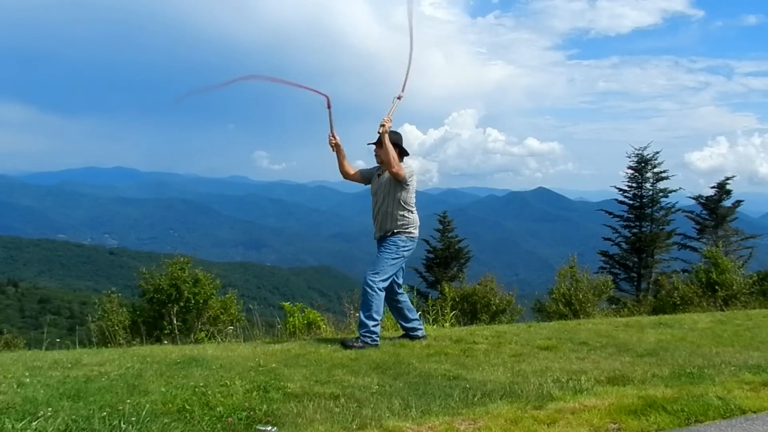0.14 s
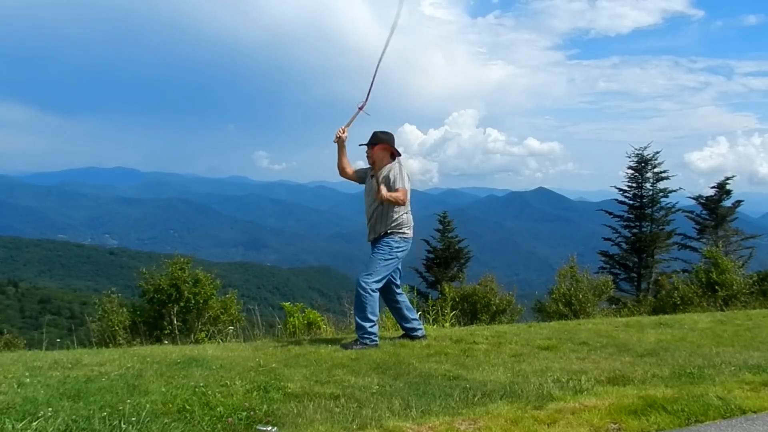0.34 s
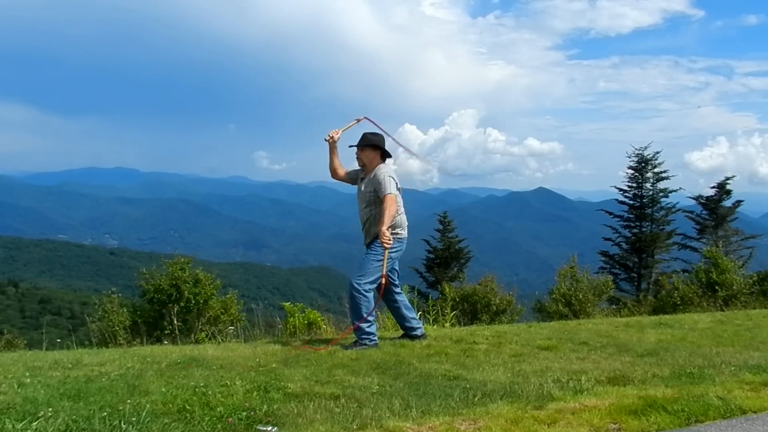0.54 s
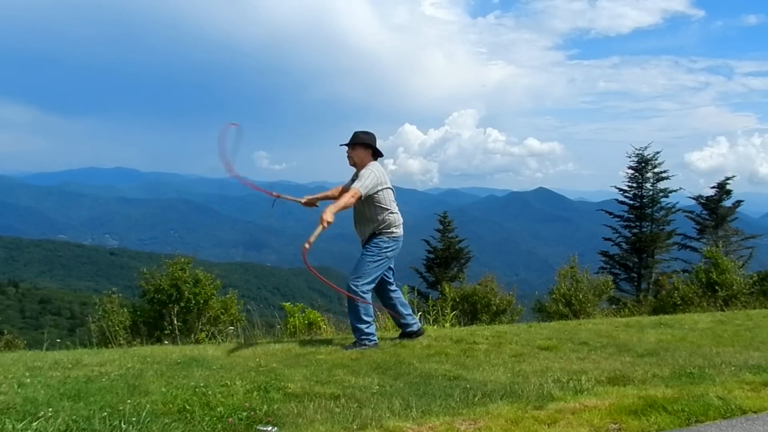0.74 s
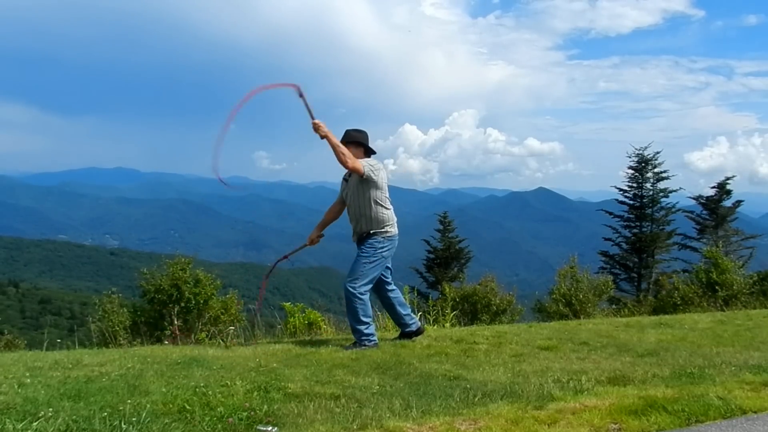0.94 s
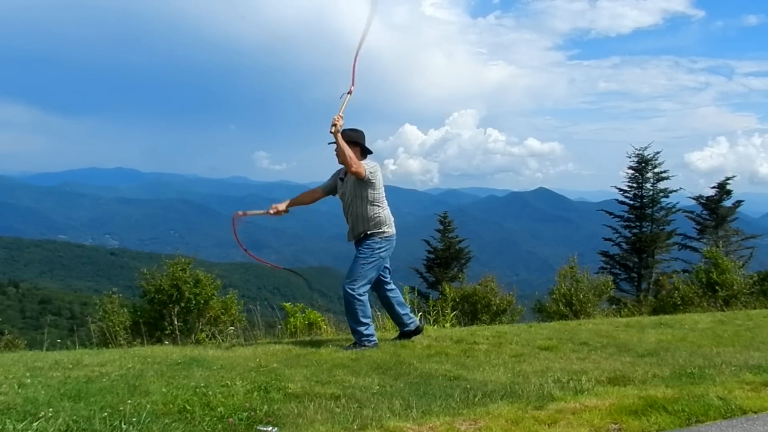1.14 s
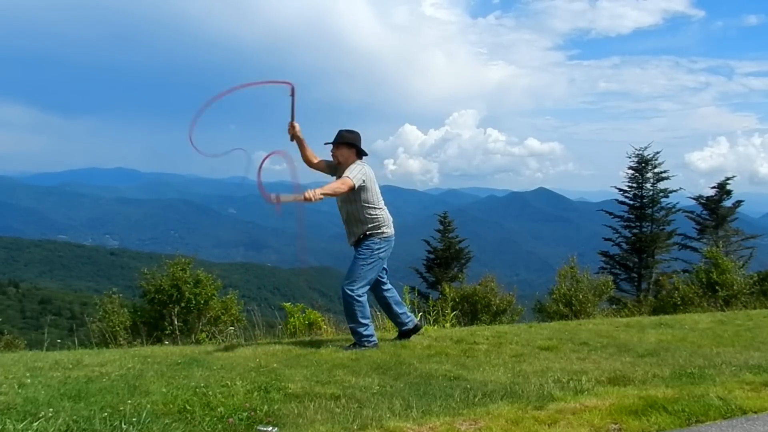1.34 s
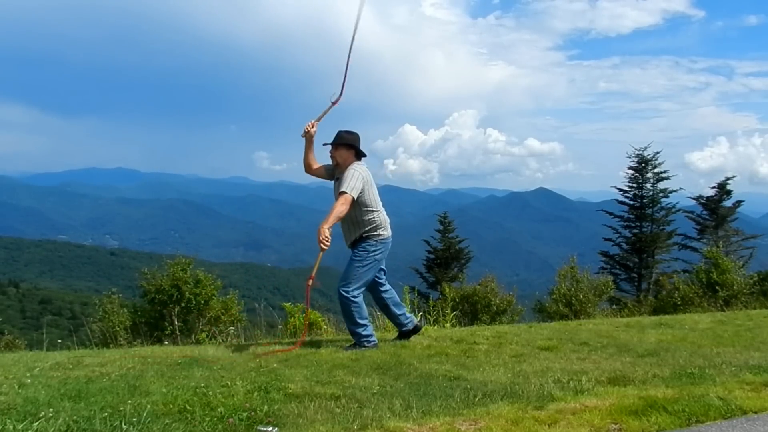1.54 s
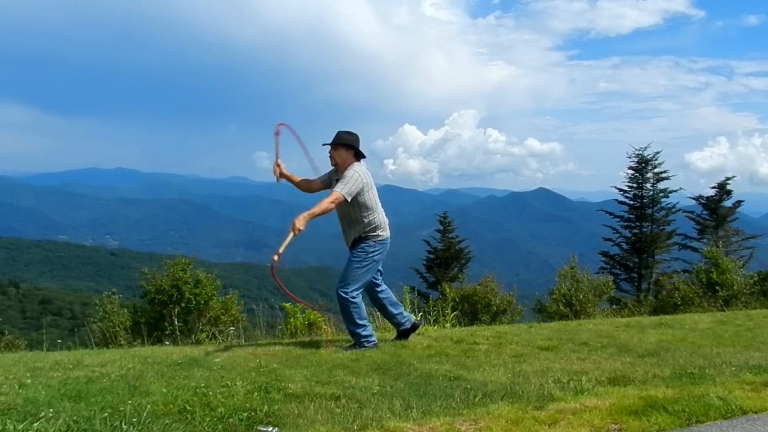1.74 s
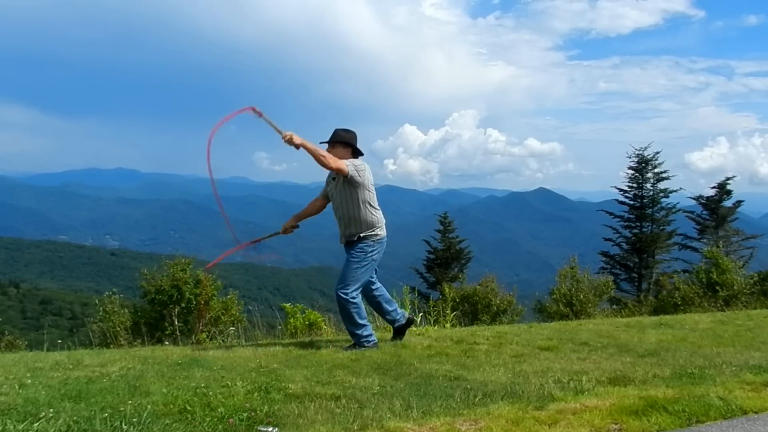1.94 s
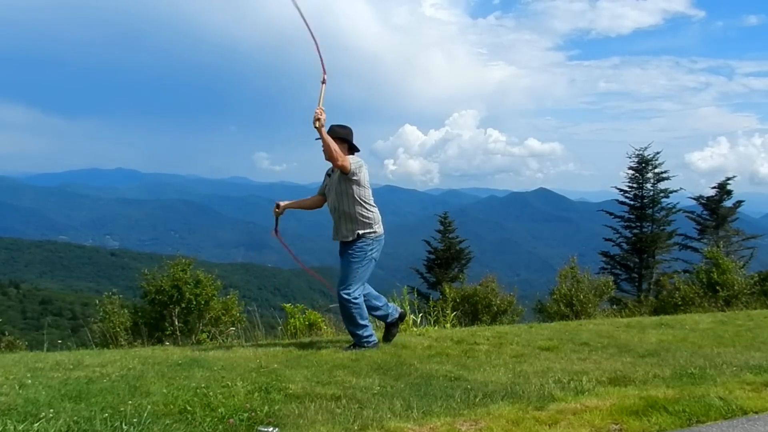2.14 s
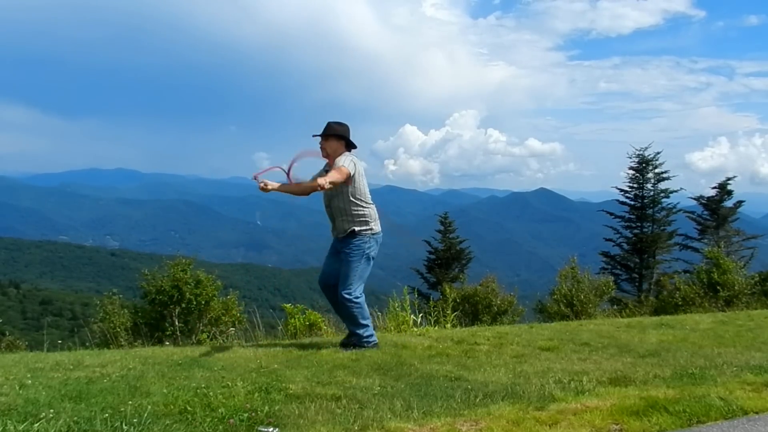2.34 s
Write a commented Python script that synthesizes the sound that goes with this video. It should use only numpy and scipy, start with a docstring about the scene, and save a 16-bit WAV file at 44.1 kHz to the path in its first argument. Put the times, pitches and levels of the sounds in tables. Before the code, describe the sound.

Two bullwhips crack about twice a second on an open hilltop, whooshing between dry snaps

```python
"""Two whips swung on an open hilltop, heard through the two microphone ports of a camera.
From the start wind rumbles (shaped noise), air murmurs and hisses (noise), and the thongs whistle (noise held
on a moving pitch) and flick (short noise puffs). Short noise swells lead up to loud cracks, each a swinging
shock front with a sharp click and a scattered noise tail. Lesser snaps are made the same way: one comes just
before a crack, and most others are cracks thrown back by nearby things.
The hiss falls away after the second crack, and later comes and goes."""
import sys
import numpy as np
from scipy import signal
from scipy.fft import rfft, irfft, next_fast_len
from scipy.io import wavfile
from scipy.ndimage import map_coordinates

SR = 44100
rng = np.random.default_rng(int(sys.argv[2]) if len(sys.argv) > 2 else 0)


def unload_wav(signal):
    """Save mono or channel-first audio to the path in sys.argv[1] as 16-bit WAV at rate SR, clipped to [-1, 1]."""
    wavfile.write(
        sys.argv[1],
        SR,
        np.round(np.clip(np.atleast_2d(signal).T, -1, 1) * 32767).astype(np.int16),
    )


N = 110250  # samples in the scene


def amp(db):
    """Turn decibels into a plain multiplier."""
    return 10 ** (np.asarray(db) / 20)


def unit(x):
    """Scale a sound to an average (RMS) level of one."""
    return x / np.sqrt(np.mean(x ** 2) + 1e-20)


def along(points, hz):
    """Read a curve of (pitch_hz, value) points, with pitch on a log axis."""
    point_hz, values = np.transpose(points)
    return np.interp(np.log(hz + 1), np.log(point_hz + 1), values)


def curves(rows):
    """Give one value per sample for each column after the time."""
    times_s, *columns = np.transpose(rows)
    return [np.interp(np.arange(N) / SR, times_s, column) for column in columns]


def wobble(rate):
    """Draw a smooth random curve through `rate` random points a second."""
    points = rng.standard_normal(int(N * rate / SR) + 4)
    return map_coordinates(points, [np.arange(N) * rate / SR])


def filtered(x, response):
    """Multiply the spectrum of x by a response that depends on frequency."""
    n = x.shape[-1]
    padded = next_fast_len(n + 8192)  # room for the filter to ring out
    spectrum = rfft(x, padded) * response(np.fft.rfftfreq(padded, 1 / SR))
    return irfft(spectrum, padded)[..., :n]


def peak(f, hz, q):
    """A resonance that rings only after it is struck; a higher q is narrower."""
    return 1j * f * hz / q / (hz * hz - f * f + 1j * f * hz / q)


def pair(n, alike):
    """Left and right noises: alike is 1 for the same, 0 for unrelated, -1 for opposite."""
    a, b = rng.standard_normal((2, n))
    angle = np.arccos(np.clip(alike, -1, 1)) / 2
    shared, opposed = np.cos(angle) * a, np.sin(angle) * b
    return np.array([shared + opposed, shared - opposed])


def add(out, s, x):
    """Mix x into out from time s, in seconds."""
    i = round(s * SR)
    out[:, i:i + x.shape[1]] += x[:, :N - i]


def wind():
    """Wind buffets the ports: lumpy low noise, partly opposed between left and right."""
    # Buffeting strength: time_s, level_db (before the lift below)
    buffeting = [(0, -54.5), (.12, -50), (.25, -55.5), (.38, -54), (.43, -43), (.52, -40), (.58, -43),
                 (.64, -55.5), (.7, -37.5), (.78, -33), (.83, -44.5), (.9, -34.5), (.95, -71.5), (1.0, -53),
                 (1.07, -55), (1.2, -69.5), (1.35, -63.5), (1.5, -57), (1.62, -69.5), (1.7, -67.5),
                 (1.85, -71), (1.97, -56.5), (2.1, -72), (2.3, -60.5), (2.4, -58), (2.5, -55)]
    # Tone of the rumble: pitch_hz, relative_db
    rumble_tone = [(12, -43.5), (20, -18.5), (54, -10), (97, 1), (169, -19.5), (198, -17.5), (273, -21.5),
                   (484, -36), (818, -47.5), (900, -40), (1170, -67.5), (1980, -120)]
    [level_db] = curves(buffeting)
    lumps = amp(3 * np.array([wobble(22), wobble(22)]))
    rumble = filtered(pair(N, -0.28), lambda f: amp(along(rumble_tone, f)))
    return amp(level_db + 8.5) * unit(lumps * rumble)


def wind_slaps():
    """Single wind slaps: one brief low swing, turned over in the right port, which is mostly the weaker."""
    # Slaps: time_s (centre 3.9 ms later), strength_db (before the lift), pitch_hz, left_right_db (before the .4)
    slap_rows = [(0.507, -33, 86.1, 6), (0.725, -29, 121, 11.5), (0.79, -21, 83, -9.5),
                 (0.869, -24, 121, 9)]
    out = np.zeros((2, N))
    t = np.arange(-900, 900) / SR
    for s, db, hz, pan_db in slap_rows:
        slap = np.sin(2 * np.pi * hz * t) * np.exp(-(2.25 * hz * t) ** 2)
        sides = np.array([[amp(pan_db / 2)], [-.4 * amp(-pan_db / 2)]])
        add(out, s + t[0] + 0.0039, amp(db + 8.5) * sides * slap)
    return out


def air():
    """A low distant murmur of air, and a hiss that loses its treble as it falls."""
    # Strength of both: time_s, murmur_db, hiss_db (before the lifts and wobbles below)
    air_levels = [(0.0, -51, -60.5), (0.47, -48.5, -61.5), (0.66, -55, -58), (0.79, -57.5, -61.5),
                  (0.93, -59, -58.5), (1.07, -77, -77), (1.14, -64.5, -82.5), (1.35, -65, -74),
                  (1.45, -55.5, -77.5), (1.58, -59, -56), (1.68, -81.5, -66.5), (1.87, -63.5, -70),
                  (2.05, -59, -69.5), (2.2, -71.5, -74.5), (2.35, -60.5, -80.5), (2.5, -51.5, -71)]
    # Tone of the murmur, then of the hiss: pitch_hz, relative_db
    murmur_tone = [(88, -39), (150, 4.5), (322, 6), (532, -11.5), (667, 2.5), (947, -14), (1220, -10.5),
                   (3000, -42.5), (3900, -61), (6600, -120)]
    hiss_tone = [(530, -29.5), (900, -13), (1100, -7.5), (1190, -14), (1310, -4.5), (2250, -14),
                 (12000, -11.5), (16000, -10.5)]
    hiss_dulls = 2.1  # dB of extra treble loss for each dB that the hiss falls
    hiss_flicker_db = 1.8
    murmur_db, hiss_db = curves(air_levels)

    murmur_points = [(60, -33.0)] + murmur_tone + [(6000, -64.5)]
    murmur = unit(filtered(pair(N, 0.84), lambda f: amp(along(murmur_points, f))))
    murmur_gain = amp(murmur_db + 1.5 + 2.9 * wobble(22))

    hiss_points = [(300, -35.0)] + hiss_tone
    hiss = unit(filtered(pair(N, 0.078), lambda f: amp(along(hiss_points, f))))
    dull = filtered(hiss, lambda f: 1 / (1 + (f / 7000) ** 8))
    hiss = dull + (hiss - dull) * amp(hiss_dulls * (hiss_db - hiss_db.max()))
    hiss_gain = amp(hiss_db + 7.5 + hiss_flicker_db * wobble(35))
    return murmur_gain * murmur + hiss_gain * hiss


def whistle(table, steady, width_hz, octave_db, swish_db):
    """Whirls of air shed by the thong: noise held on the pitch, its octave, and a broad rough swish."""
    hz, level_db = curves(table)
    turn = 2 * np.pi * np.cumsum(hz) / SR

    def line(order):
        """Slow noise moved up to a multiple of the pitch; `steady` makes it purer."""
        slow = filtered(rng.standard_normal((2, N)), lambda f: 1 / (1 + (f / (order * width_hz)) ** 4))
        slow = unit(slow) + [[steady], [0]]
        return unit(slow[0] * np.cos(order * turn) + slow[1] * np.sin(order * turn))

    # The swish is rough noise, filtered slice by slice to follow the pitch.
    rough = pair(N, .85) * amp(3.2 * wobble(150))
    f, t, slices = signal.stft(rough, SR, nperseg=512)
    slice_hz = np.interp(t, np.arange(N) / SR, hz)
    gain = abs(peak(f[:, None], 0.98 * slice_hz, q=1.1)) ** 3
    swish = unit(signal.istft(slices * gain, SR, nperseg=512)[1][:, :N])
    return amp(level_db) * (line(order=1) + amp(octave_db) * line(order=2) + amp(swish_db) * swish)


def colour(hz, q, bass_db, treble_db, top_db):
    """A tone of four parts: a body resonance, a bass part, a treble bump and an airy top."""
    def response(f):
        body = peak(f, hz, q) / (1 + 1j * f / (3 * hz))
        bass = peak(f, 310, 0.42) / (1 + 1j * f / 4000)
        treble = peak(f, 5280, 1.7) ** 2
        top = 2 * (1j * f / (8300 + 1j * f)) ** 2
        return body + amp(bass_db) * bass - amp(treble_db) * treble - amp(top_db) * top
    return response


def spread(n, shape, spiky_db):
    """Coloured spiky noise, near mono in the bass and wide in the treble."""
    # How far the side (left-right difference) sits under the middle: pitch_hz, gain_db
    side_gain = [(300, -22), (1500, -8), (4000, -5.5), (9000, -2)]
    spikes = amp(spiky_db * (wobble(800) + 0.33 * wobble(180))[:n])
    a, b = rng.standard_normal((2, n)) * spikes
    mid = filtered(a, shape)
    side = filtered(b, lambda f: shape(f) * amp(along(side_gain, f)))
    return unit(np.array([mid + side, mid - side]))


def flicks():
    """Flicks of the thong: puffs of coloured noise that rise fast and die away. The row at 0.6 s is instead a
    high ring of the first crack."""
    # Flicks: start_s, strength_db (noise is set 17.5 dB lower), pitch_hz (centre), t60_s (time to fade 60 dB),
    # bass_db, treble_db, top_db (gains of the colour's parts), rise_s
    flick_rows = [(0.027, -29, 1550, 0.057, -15, -5, -10, 0.0012),
                  (0.174, -19, 1220, 0.086, -10, -8, -56, 0.00067),
                  (0.193, -30.5, 1100, 0.41, -13, -10.5, -15, 0.0017),
                  (0.259, -18, 724, 0.13, -11, -12.5, -62, 0.0006),
                  (0.505, -31, 643, 0.1, -19, -27.5, -38, 0.0023),
                  (0.6, -3.5, 6200, 0.064, -50, -40, -45, 0.0021),
                  (0.528, -31, 12500, 0.1, -40, -40, -40, 0.0068),
                  (0.673, -24, 668, 0.044, 10, -4, -17, 0.0011),
                  (0.893, -22.5, 1160, 0.097, -19, -17, -24, 0.0026),
                  (1.022, -35.5, 1560, 0.095, -28, -9.5, -48, 0.0023),
                  (1.089, -42, 624, 0.44, -17, -22, -40, 0.0023),
                  (1.126, -25.5, 1250, 0.063, 26.5, 23, -48, 0.00097),
                  (1.967, -24, 610, 0.049, -1.5, -33.5, -60, 0.0012),
                  (2.001, -16.5, 1340, 0.088, 23, 5, -25, 0.0051),
                  (1.89, -42, 300, 0.2, -7, -50, -62, 0.028),
                  (2.161, -38, 918, 0.097, -1, -10.5, -36, 0.0022)]
    out, t = np.zeros((2, N)), np.arange(SR // 4) / SR
    for s, db, hz, t60, bass_db, treble_db, top_db, rise in flick_rows:
        puff = spread(len(t), colour(hz, 2.3, bass_db, treble_db, top_db), spiky_db=1.5)
        fade = amp(db - 17.5 - 60 * t / t60)
        add(out, s, puff * fade * (1 - np.exp(-t / max(rise, 1e-4))))
    return out


def swells():
    """A short noise swell leading up to each crack, which then stops."""
    # Swells: end_s, end_db
    swell_rows = [(0.598, -33), (.92, -27.5), (1.555, -25.5), (2.022, -37.5)]
    rise_db_per_s = 700
    out, t = np.zeros((2, N)), np.arange(SR // 14) / SR
    for s, db in swell_rows:
        noise = spread(len(t), colour(1400, 0.17, -12.0, -13, -14.5), spiky_db=0.5)
        add(out, s - t[-1], noise * amp(db - rise_db_per_s * t[::-1]))
    return out


def cracks(table, q, cycles, click_hz, jump_s, slap_db):
    """A shock front swings around a pressure jump, repeats unevenly, then ground and grass scatter it."""
    front_s = .001  # lead-in before the front
    subhits, subhit_span_s, subhit_fade_db = 7, 0.015, 12  # the frayed tip slaps on after the front
    out, t = np.zeros((2, N)), np.arange(SR // 5) / SR
    for s, db, hz, click_db, t60, scatter_db, bass_db, treble_db, top_db, pan_db in table:
        u = hz * (t - front_s) - .75  # time counted in swings, zero at the jump
        front = -np.cos(2 * np.pi * u) * np.exp(-np.where(u < 0, (2 * u) ** 2, u / cycles))
        from_jump_s = abs(u / hz)
        jump = np.sign(u) * np.exp(-from_jump_s / jump_s)
        jump = jump + 0.5 * np.exp(-from_jump_s / 0.0003) * pair(len(t), .8)
        click = amp(click_db) * filtered(jump, lambda f: 1 / (1 + (f / click_hz) ** 6))

        # Repeat front and click at random delays, either way up.
        late, size = rng.random((2, subhits))
        slaps = np.zeros(len(t))
        slaps[0] = 1
        places = (SR * (front_s + subhit_span_s * late)).astype(int)
        slaps[places] = amp(slap_db - subhit_fade_db * late) * (2 * size - 1)
        snap = signal.fftconvolve(front + click, slaps[None], axes=1)[:, :len(t)]

        # The scattered tail fades, its treble faster than its bass.
        tail = spread(len(t), colour(hz, q, bass_db, treble_db, top_db), spiky_db=3.0)
        tail = tail * amp(scatter_db - 60 * t / t60) * (1 - np.exp(-(t / (2 * front_s)) ** 2))
        dull = filtered(tail, lambda f: 1 / (1 + 1j * f / 2500))
        tail = dull + (tail - dull) * amp(-300 * t)
        sides = amp(db + np.array([[pan_db / 2], [-pan_db / 2]]))
        add(out, s, sides * (snap + tail))
    return out


def scene():
    """Sum wind, air, whistling thongs, flicks, swells, cracks and lesser snaps."""
    # Whistle of the thong: time_s, pitch_hz, level_db (of the line on the pitch)
    thong_path = [(0, 1500, -76), (.05, 1600, -56), (.1, 1200, -78), (.165, 1300, -58), (.18, 1246, -34.5),
                  (.2, 1093, -38.5), (.232, 1068, -41.5), (.24, 720.6, -47.5), (.27, 720, -37.5),
                  (.32, 800, -47), (.4, 680, -49.5), (.46, 800, -58.5), (.53, 640, -44.5),
                  (.56, 650, -80.5), (.66, 660, -47), (.72, 650, -106), (.93, 714, -39.5), (1.0, 900, -104),
                  (1.11, 900, -83), (1.15, 2200, -58.5), (1.18, 1400, -65.5), (1.21, 702.3, -58),
                  (1.28, 702.2, -63.5), (1.33, 613.3, -64), (1.39, 780, -56.5), (1.45, 750, -68),
                  (1.52, 700, -54), (1.64, 680, -73.5), (1.82, 680, -65.5), (1.9, 680, -84.5),
                  (2.1, 696.6, -93), (2.155, 660, -55), (2.19, 678.4, -74), (2.28, 700, -75.5),
                  (2.38, 695.4, -77.5), (2.42, 784, -56.5), (2.425, 1450, -58), (2.445, 1428, -50),
                  (2.45, 813.4, -62.5), (2.5, 750, -54.5)]
    # Faster, thinner end of the thong, broad and rough: same columns
    tip_path = [(0, 1500, -74), (.165, 1900, -80), (.178, 1900, -53.5), (.195, 1600, -38.5),
                (.21, 1350, -47.5), (.235, 1300, -53.5), (.26, 1600, -52), (.33, 1400, -59.5),
                (.4, 1300, -85), (.48, 1500, -61), (.55, 1300, -85), (.64, 1100, -46.5), (.7, 1000, -78),
                (1.1, 1200, -77.5), (1.14, 1500, -61), (1.2, 1500, -82), (1.27, 900, -80.5),
                (1.32, 1100, -65), (1.36, 900, -64), (1.41, 1220, -63.5), (1.46, 1100, -71),
                (1.52, 1000, -90.5), (2.14, 1000, -86.5), (2.2, 1500, -64.5), (2.25, 1300, -79.5),
                (2.38, 1000, -80), (2.42, 1400, -66.5), (2.445, 2000, -69), (2.48, 1300, -66),
                (2.5, 1000, -74)]
    # Shock fronts of the cracks: start_s, front_db (split by left_right_db), pitch_hz (ring), click_db,
    # t60_s (time the scatter takes to fade 60 dB, before its treble loss), scatter_db,
    # bass_db, treble_db, top_db (gains of the scatter colour's parts), left_right_db
    crack_rows = [(0.5932, -12.5, 273, -5, 0.11, -4.5, 36.5, -25.5, -23.5, 1.5),
                  (0.6042, -7.5, 1510, -7.5, 0.11, -21, -9.5, -10, -28.5, 1),
                  (0.918, -4, 1280, 2.5, 0.068, -8.5, 5, -15.5, -13.5, 1),
                  (1.5525, -12.5, 703.4, 6.5, 0.06, -1.5, -10, -5.5, -12.5, 1),
                  (1.558, -18.5, 790, 6.5, 0.12, -6.5, -14, -1, -9, 2),
                  (2.02, -5.5, 1447, -6.5, 0.073, -11.5, -6.5, -20.5, -25.5, 1)]
    # Lesser snaps, one small snap before a crack, the others mostly returns of the cracks: same columns
    lesser_snap_rows = [(0.958, -23.5, 1531, -3, 0.056, -11, -27.5, -13, -49, 4),
                        (1.042, -44.5, 1530, -1, 0.074, -11, -24, -21, -45, 3.3),
                        (1.5247, -23, 1410, -2, 0.026, -4, -13.5, -8, -38, 2.6),
                        (1.595, -18, 1525, -10, 0.051, -13, -32, -5, -28, 3.9),
                        (1.655, -46, 1620, -6, 0.11, -5, -3, 19, -31, 1.3),
                        (1.678, -38, 1860, 3, 0.085, -7.5, -2, 6, -28, 4.2),
                        (1.738, -49.5, 1040, 3, 0.15, -5, -7, -4.5, -49, 2.2),
                        (2.059, -18, 1920, 0, 0.066, -16, -12, -21, -40, 4),
                        (2.143, -46.5, 1070, 8, 0.099, -4.5, -14.5, -9.5, -31.5, 5.2),
                        (2.216, -51.5, 1830, 0, 0.074, -21.5, -25.5, -7, -32.5, 3),
                        (2.325, -48, 1107, -20.5, 0.068, -19, -7.5, -13, -39, 3.8)]
    background = wind() + wind_slaps() + air()
    thongs = whistle(thong_path, steady=.55, width_hz=80, octave_db=-14, swish_db=-6)
    thongs = thongs + whistle(tip_path, steady=.35, width_hz=100, octave_db=-10.5, swish_db=2)
    puffs = flicks() + swells()
    snaps = cracks(crack_rows, q=4.5, cycles=.8, click_hz=16500, jump_s=.00006, slap_db=-12)
    snaps = snaps + cracks(lesser_snap_rows, q=1.8, cycles=0.26, click_hz=5900, jump_s=.0001, slap_db=-22)
    return background + thongs + puffs + snaps


def record(dry):
    """The camera rounds off the highest peaks and cuts steeply above its band limit."""
    ceiling, top_hz = .66, 15800
    held = dry / (1 + abs(dry / ceiling) ** 4) ** .25
    return filtered(held, lambda hz: 1 / (1 + (hz / top_hz) ** 90))


dry = scene()
out = record(dry)
unload_wav(out)
```